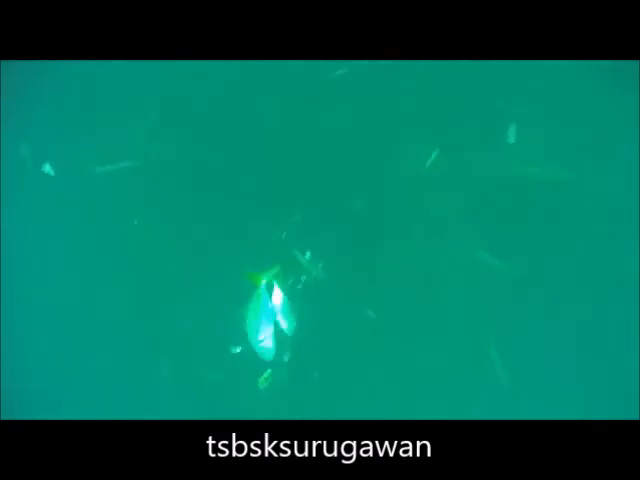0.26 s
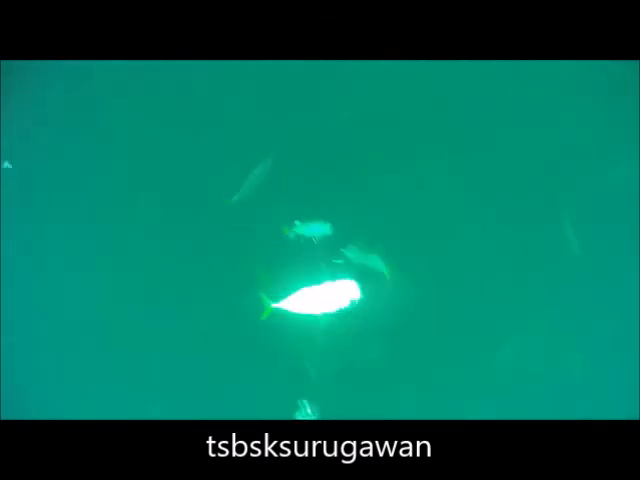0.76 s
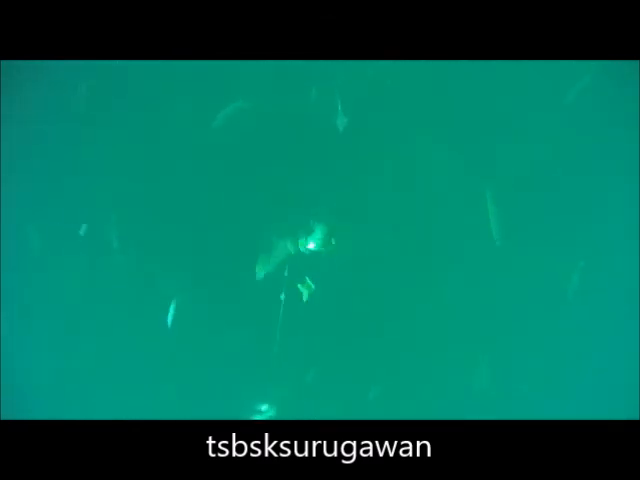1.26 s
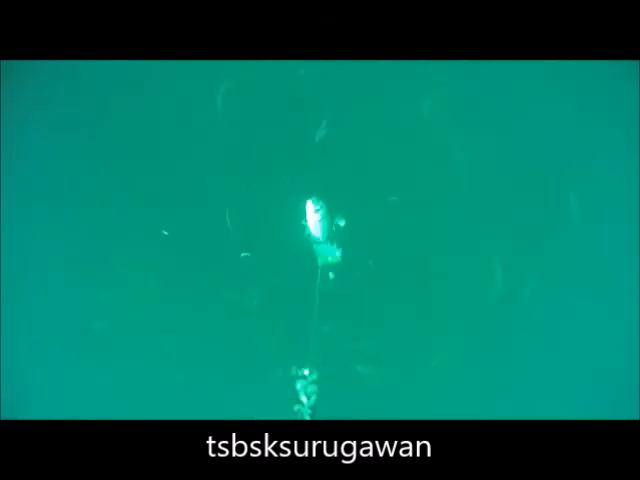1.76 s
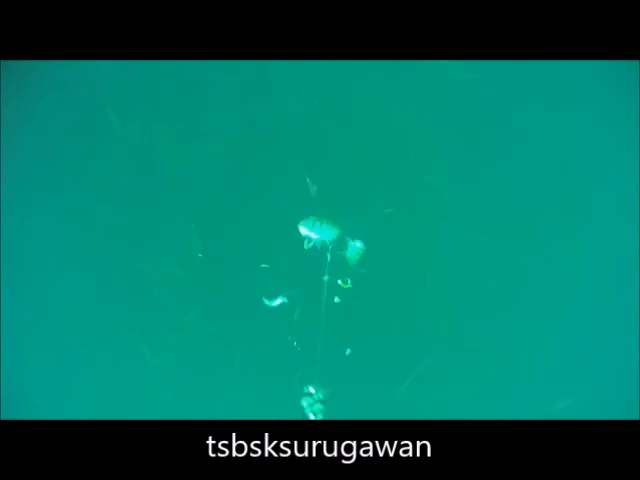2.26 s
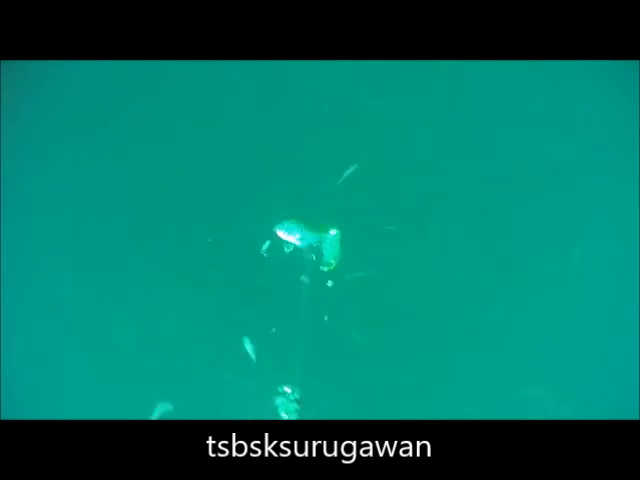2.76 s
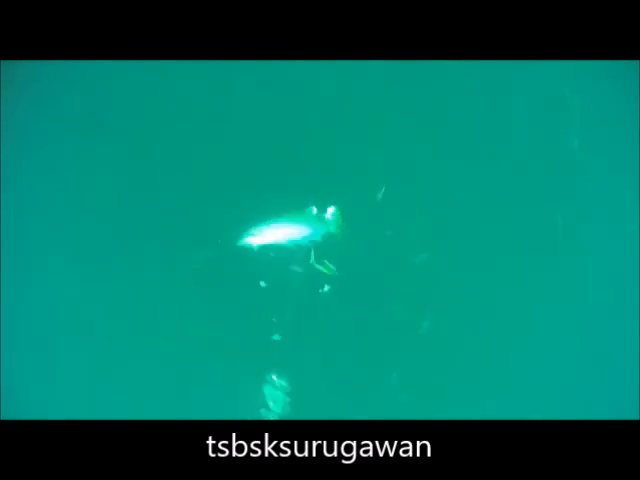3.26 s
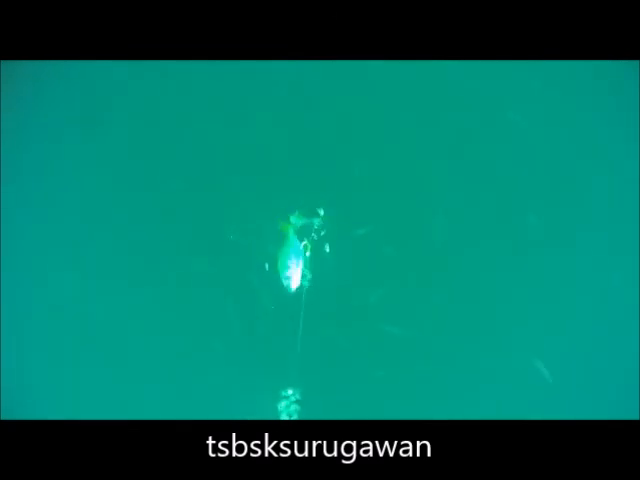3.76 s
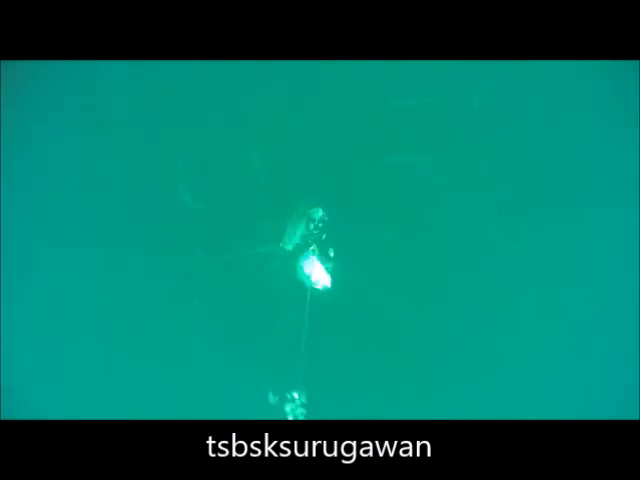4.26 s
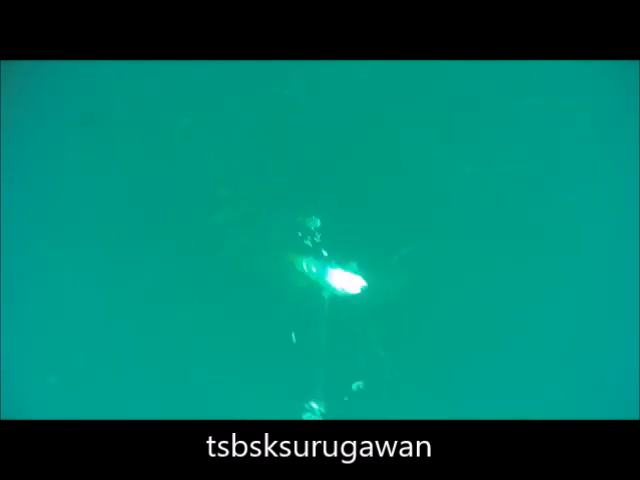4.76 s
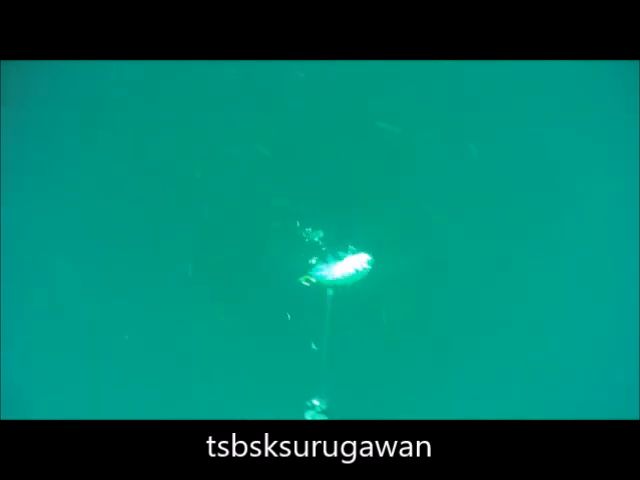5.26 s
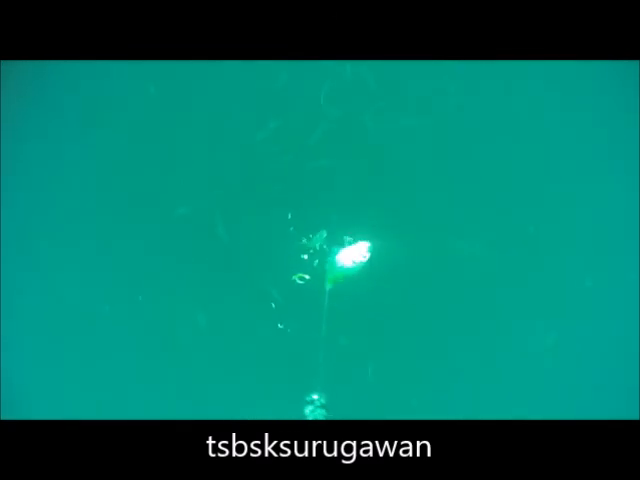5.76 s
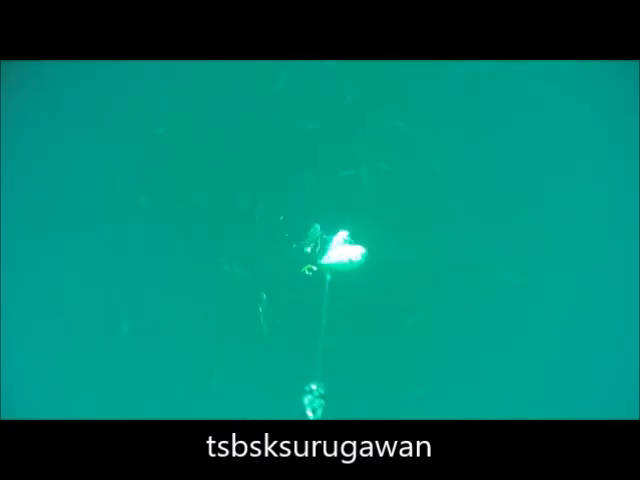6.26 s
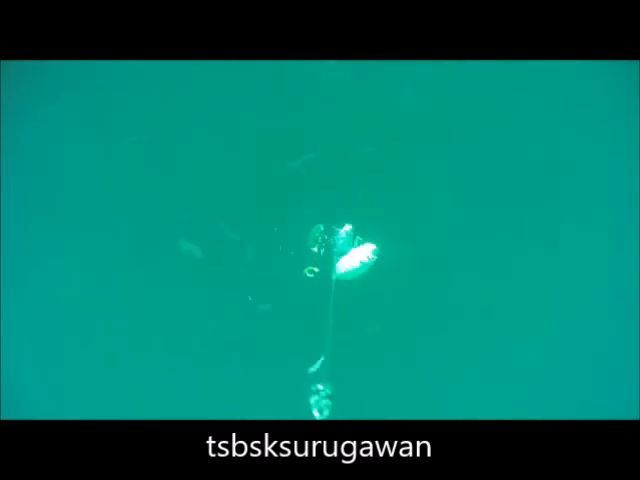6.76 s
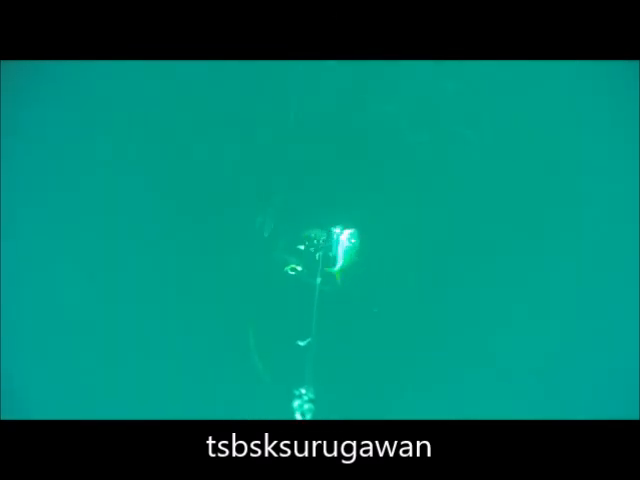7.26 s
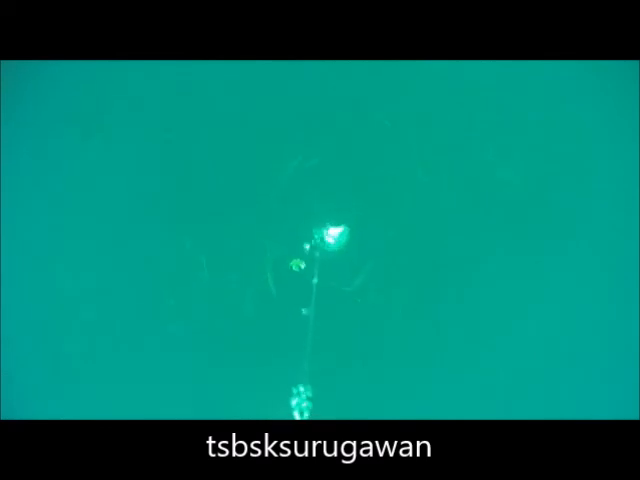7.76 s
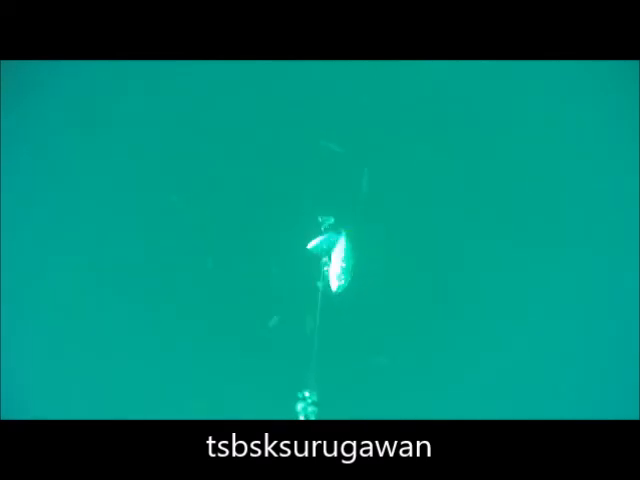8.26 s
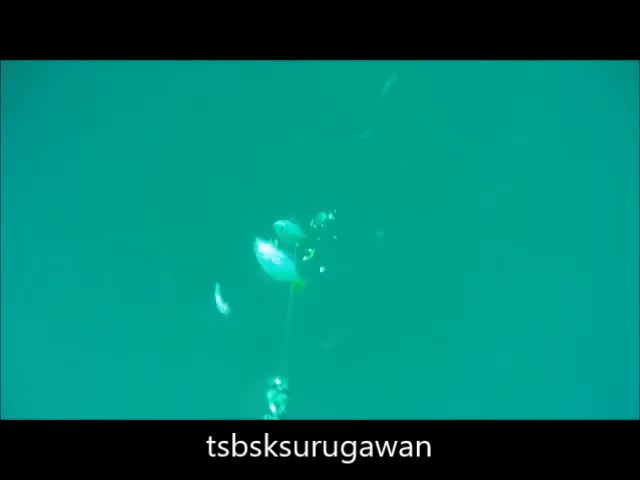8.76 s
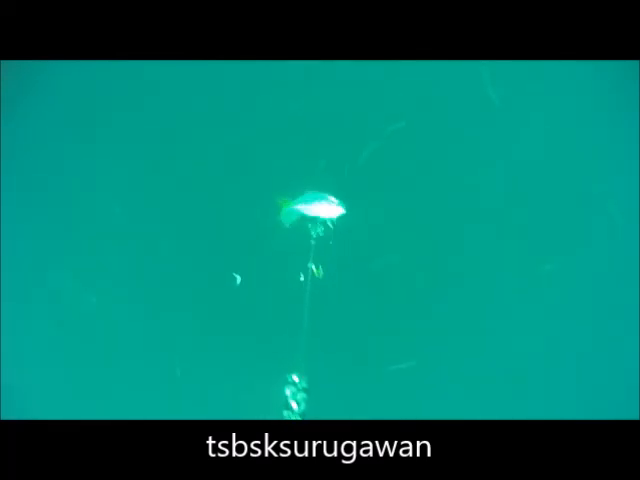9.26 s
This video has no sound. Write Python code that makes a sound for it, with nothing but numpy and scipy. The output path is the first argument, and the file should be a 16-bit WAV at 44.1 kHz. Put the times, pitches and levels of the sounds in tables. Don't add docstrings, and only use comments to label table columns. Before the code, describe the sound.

A microphone sealed in a small plastic housing under water hears a continuous hollow rush, boxy and mid-pitched, with low wash and fine fizzing. From about 0.2 to 0.9 seconds a thrashing fish makes the rigging hammer the shell: a tight cluster of hard knocks and bright clicks, sharpest near 0.7 and 0.85. Afterwards only soft, rounded tug thumps, light raps and tiny ticks come irregularly. The taut line strums with a fluttering hum briefly around 2.1 and 3.5, more strongly from 5.2 to 5.9 and 6.8 to 7.7. Near 7.9 it slackens to a lower hum, then tightens around 9 as hauling makes the water rush and roar louder, with a firm thump near 9.3, until the end at 9.5. A faint distant gear whine, slightly stronger around 6 to 7, and thin electronic hiss and whistles remain behind.

```python
import sys
import numpy as np
from scipy import signal
from scipy.fft import rfft, irfft
from scipy.io import wavfile
from scipy.ndimage import uniform_filter1d

SR = 44100
rng = np.random.default_rng(int(sys.argv[2]) if len(sys.argv) > 2 else 0)


def bounce(signal):
    frames = np.transpose(np.atleast_2d(signal))
    limited = np.clip(frames, -1, 1)
    pcm = np.round(limited * 32767).astype(np.int16)
    wavfile.write(sys.argv[1], SR, pcm)


def gain_from_db(level_db):
    decades = np.asarray(level_db, float) / 20
    return 10 ** decades


N = 419391
SECONDS = np.arange(N) / SR


def rms_one(x):
    return x / np.sqrt(np.mean(x ** 2) + 1e-20)


def in_time(rows):
    s, *columns = np.transpose(rows)
    return [np.interp(SECONDS, s, column) for column in columns]


def drift(rate_hz):
    every = 40
    r = np.exp(-2 * np.pi * rate_hz * every / SR)
    noise = rng.standard_normal(N // every + 2002)
    slow = signal.lfilter([1], [1, -2 * r, r * r], noise)[2000:]
    return np.interp(np.arange(N) / every, np.arange(len(slow)), rms_one(slow))


def colour(x, points):
    hz, db = np.transpose(points)
    grid = np.maximum(np.fft.rfftfreq(N, 1 / SR), 1)
    octaves_below = np.maximum(np.log2(hz[0] / grid), 0)
    octaves_above = np.maximum(np.log2(grid / hz[-1]), 0)
    gain_db = np.interp(np.log(grid), np.log(hz), db) - 36 * (octaves_below + octaves_above)
    return rms_one(irfft(rfft(x) * gain_from_db(gain_db), N))


def resonance(x, hz, width_hz):
    r = np.exp(-np.pi * width_hz / SR)
    poles = [1, -2 * r * np.cos(2 * np.pi * hz / SR), r * r]
    return signal.lfilter((1 - r * r) / 2 * np.array([1, 0, -1]), poles, x)


def grains(per_s, spread_db):
    sizes = gain_from_db(spread_db * np.minimum(rng.exponential(1, N), 5)) * rng.choice([-1, 1], N)
    return rms_one(sizes * (rng.random(N) < per_s / SR))


def tone(hz, level_db):
    cycles = np.cumsum(hz * np.ones(N)) / SR + rng.random()
    return np.sqrt(2) * gain_from_db(level_db) * np.sin(2 * np.pi * cycles)


def bump(at_s, width_s):
    return np.exp(-((SECONDS - at_s) / width_s) ** 2)


def haul(lag_s):
    haul_s, rise_s = 7.92, 0.35
    return 1 / (1 + np.exp((haul_s + lag_s - SECONDS) / rise_s))


# pitch_hz, width_hz, level_db
CAVITY_MODES = [(650, 990, -9), (716.5, 163, 15)]
PLATE_MODES = [(1200, 200, -27), (1560, 260, -19), (1810, 195, 0), (2050, 350, -26)]
SHELL_MODES = [(2440, 290, -4), (2990, 500, 0.5), (3650, 420, -1)]
LENS_MODES = [(4400, 240, -19), (4960, 500, 3), (5500, 400, -15), (6250, 600, -9), (7500, 600, -16)]
PORT_MODES = [(7950, 590, -4.5), (9110, 480, -0.5), (11200, 790, -8), (12860, 760, -23), (13800, 1600, -21)]
MOUNT_MODES = [(130, 67, 2), (553, 140, -19)]
FRAME_MODES = [(273, 120, -16), (600, 126, -2), (1190, 106, -5)]
CONTACT_MS = [0.77, 2.2, 1.5, 1.47, 2, 4.2, 3.9]
SNAP = [10.4, 84, 0.67, 4.4, 7, 7.9, 21]
LOADING = [0.63, 2.1, 0.69, 20, 7.2, 0.98, 11]
CAVITY, PLATE, SHELL, LENS, PORT, MOUNT, FRAME = range(7)
RING_SIZE = 2048


def strike(part, peak_db, chance, stretch=1, colour_db=(0,) * 5, widen=1):
    modes = [CAVITY_MODES, PLATE_MODES, SHELL_MODES, LENS_MODES, PORT_MODES, MOUNT_MODES, FRAME_MODES][part]
    ms = np.arange(len(chance)) / SR * 1000
    push = chance * np.exp(-(ms / CONTACT_MS[part]) ** 2)
    push[0] = SNAP[part] * np.sign(chance[0])
    ring = 0
    for j, (hz, width, db) in enumerate(modes):
        hz, width = hz * stretch, width * widen
        swell = resonance(resonance(push, hz, width), hz, 1.53 * width)
        uneven_db = db + colour_db[j] + 2.0 * chance[-1 - j]
        ring = ring + gain_from_db(uneven_db) * resonance(swell, hz, LOADING[part] * width)
    return gain_from_db(peak_db) * ring / np.max(np.abs(ring))


# start_s, level_db
FLOW = [(0.0, -29.5), (0.72, -37), (1.43, -31.5), (1.75, -34.5), (2.41, -32.5), (5.64, -31), (6.04, -35.5),
        (6.25, -30.5), (7.23, -33.5), (7.55, -31), (7.92, -32), (8.87, -28.5), (9.51, -26)]
# start_s, level_db
SWAYS = [(0.3, 7), (0.95, 4), (1.6, 10), (3.2, 6), (4.2, 4.5), (4.9, 3.5), (5.951, 3.5), (6.7, 3.5),
         (7.6, 2), (8.3, 7), (8.9, 7.5)]
# pitch_hz, level_db
RUSH = [(380, -30), (500, -31), (590, -5.5), (680, 2), (790, 6), (880, -6.5), (980, -19), (1180, -18.5),
        (1330, -39)]
PLATE_RUSH = [(1250, -39), (1500, -1), (1750, 5.5), (1900, 0.5), (2020, 2.5), (2150, -8), (2400, -11)]
WASH = [(22, -21), (60, -19), (85, -18.5), (110, -2.5), (150, 4.5), (190, -8)]
FIZZ = [(2100, -23), (2600, -5), (3200, -3), (3650, 4), (3850, -8.5), (4050, -32), (5000, -17.5),
        (6500, -34)]


def water(ease):
    cavity_db = in_time(FLOW)[0] - 2.0
    wash_db = -62.5 + sum(db * bump(s, 0.43) for s, db in SWAYS)
    plate_db = -52 + 7.5 * bump(0.55, 0.39)
    crackle_db = -56.5 + 2.5 * haul(0)
    white = rng.standard_normal((4, N))
    specks = grains(per_s=540, spread_db=-0.5)

    cavity_push = white[0] + 0.39 * grains(per_s=120, spread_db=-1.5)
    cavity = colour(cavity_push, RUSH) * gain_from_db(cavity_db + 0.84 * drift(3.4))
    plate_push = white[1] + 0.3 * specks + 0.49 * grains(per_s=40, spread_db=0.5)
    plate = colour(plate_push, PLATE_RUSH) * gain_from_db(plate_db + 1.8 * drift(5.5))
    wash = colour(white[2], WASH) * gain_from_db(wash_db + 1.3 * drift(6.6))
    crackle = colour(white[3] + 0.56 * specks, FIZZ) * gain_from_db(crackle_db + 2.0 * drift(25.0))
    port = sum(gain_from_db(db) * resonance(specks, hz, width) for hz, width, db in PORT_MODES + LENS_MODES)
    return ease * cavity + plate + wash + crackle + gain_from_db(crackle_db - 12.0) * rms_one(port)


# start_s, pitch_hz, level_db
STRUM = [(1.9, 667, -84), (2.1, 719.6, -30.5), (2.3, 794.5, -35), (2.4, 620, -41), (3.3, 627.8, -46.5),
         (3.43, 645, -33), (3.58, 640, -31), (3.66, 607, -36), (3.8, 600, -40.5), (3.95, 600, -48.5),
         (5.1, 646.7, -41), (5.17, 652, -31), (5.27, 660, -33), (5.33, 680, -51), (5.37, 735, -26.5),
         (5.42, 700, -25), (5.47, 725, -28), (5.53, 725, -35), (5.63, 765, -26), (5.67, 740, -30),
         (5.7, 695, -28), (5.75, 735, -26), (5.8, 745, -29.5), (5.86, 705, -27.5), (5.9, 655, -37),
         (5.95, 691, -54), (6.12, 650, -38), (6.3, 591, -37), (6.45, 600, -47), (6.65, 641.2, -50),
         (6.82, 645, -33.5), (6.9, 710, -33.5), (6.99, 692, -30), (7.04, 705, -32.5), (7.09, 745, -22),
         (7.13, 700, -29), (7.2, 690, -26), (7.27, 715, -27), (7.32, 685, -28), (7.42, 685, -30.5),
         (7.5, 660, -32.5), (7.56, 700, -26), (7.63, 650, -32), (7.7, 640, -36.5), (9.21, 670, -33.5),
         (9.27, 640, -38.5), (9.4, 645, -33.5), (9.51, 700, -22)]
# start_s, pitch_hz, level_db
SLACK = [
    (7.78, 585, -43),
    (7.869, 495, -46.5),
    (8.15, 506, -34.5),
    (8.45, 522, -39.5),
    (8.649, 580.4, -44.5),
    (8.901, 600, -31),
    (8.999, 640, -26),
    (9.101, 620, -29.5),
]


def line_strum():
    hz, level_db = in_time(sorted(STRUM + SLACK))
    phase = 2 * np.pi * np.cumsum(hz + 8.0 * drift(14)) / SR
    fray = 0.3 + 0.007 * np.maximum(662 - hz, 0)
    steady = 2.5 + drift(35.0) + fray * drift(54.0)
    slipping = drift(25.0) + fray * drift(47.0)
    wave = steady * np.cos(phase) + slipping * np.sin(phase)
    return gain_from_db(level_db) * rms_one(wave / np.sqrt(1 + fray ** 2))


# start_s, thump_db, click_db, place
KNOCKS = [(0.213, -14.5, -25, 1.1), (0.3527, -14.5, -20.5, -0.33), (0.3566, -21, -25, 0.7),
          (0.368, -27, -34, 0.16), (0.363, -22, -29, -0.35), (0.3728, -28, -28, 0.25),
          (0.3905, -29, -30, 1.1), (0.4096, -15.5, -30, -0.36), (0.427, -10.5, -30, 0.087),
          (0.475, -21, -33, -0.14), (0.5215, -25, -19, 0.41), (0.5384, -23.5, -35, 0.4),
          (0.5684, -2.5, -19, -0.13), (0.5962, -22, -22, 1.36), (0.6, -17.5, -33, 0.1),
          (0.7018, -10.5, -3.5, 1.15), (0.716, -23, -32, 0.12), (0.736, -23, -29, -0.22),
          (0.8213, -26, -29, -0.71), (0.8473, -9.5, -7.5, 1.23), (0.8502, -19, -16, 1.6),
          (0.8535, -12, -21, 0.74), (0.8556, -11.5, -16, 0.79)]
# start_s, thump_db, click_db, place
RAPS = [(1.386, -28, -34, 0.15), (1.401, -26.5, -31, 0.52), (1.7902, -41, -35.5, 0.27),
        (1.869, -32, -24, -0.57), (1.885, -45, -33.5, 0.11), (3.3589, -28, -31, 0.29),
        (3.362, -19.5, -27, 0.48), (3.4732, -34, -33, -0.0008), (3.7066, -36, -26, 0.14),
        (3.7896, -27.5, -25, 0.9), (3.874, -32, -38, 0.15), (3.9496, -27, -29, 0.23),
        (4.1748, -26.5, -24, 0.84), (7.1419, -32, -38, -0.14), (7.6585, -34, -28, 0.69),
        (7.867, -18.5, -30, 0.28), (8.0887, -44, -26, 0.05), (8.0967, -39, -26.5, 0.6),
        (8.191, -34, -36.5, 0.067), (8.4955, -41, -27.5, 0.38), (8.5058, -42, -23, 0.93),
        (9.0574, -35, -38, 0.18), (9.357, -31.5, -37, 0.5), (9.413, -29.5, -32, -0.25)]
# start_s, click_db, place
CLICKS = [(0.014, -29.5, 2.85), (0.8363, -26, 1.76), (1.2433, -25, 3.2), (1.262, -37, 2.1),
          (2.2326, -28, 2.7), (2.2478, -31, 1.6), (3.533, -38, 1.3), (6.3465, -35, 2.4), (6.4622, -37, 2.7),
          (7.4437, -31, 0.79), (7.6519, -24, 1.5), (8.0637, -33, 0.89), (8.598, -35, 0.83),
          (8.7289, -34, 2.8), (8.7904, -32, 1.8)]


def knocks():
    out = np.zeros(N + RING_SIZE)
    thrash_end_s = KNOCKS[-1][0]
    clicks = [(s, db, place, 7.5) for s, _, db, place in KNOCKS + RAPS]
    clicks += [(s, db, place, 3.5) for s, db, place in CLICKS]
    for s, click_db, place, loss_db in clicks:
        chance = rng.standard_normal((3, RING_SIZE))
        light = s > thrash_end_s
        for k, part in enumerate([SHELL, LENS, PORT]):
            tilt_db = 3.5 * np.arange(5) * (light and part == SHELL)
            peak_db = click_db - loss_db * (k - place) ** 2
            out[round(s * SR):][:RING_SIZE] += strike(part, peak_db, chance[k], 0.98, tilt_db, 1.4 ** light)
    for s, thump_db, _, place in KNOCKS + RAPS:
        stretch = 1 + 0.055 * place - 0.044 * (s > thrash_end_s)
        side_modes_db = 9.5 * abs(place) * np.array([1, 1, 0, 1])
        chance = rng.standard_normal(RING_SIZE)
        out[round(s * SR):][:RING_SIZE] += strike(PLATE, thump_db, chance, stretch, side_modes_db)
    return out[:N]


COUPLING_DB = [-4, 0, -15.5, -19.5, -4.5, -7.5, 0.5]
# start_s, peak_db, pitch_hz
TUGS = [(0.288, -14.5, 730), (0.4092, -7, 790), (0.568, -8.5, 790), (0.701, -13, 650), (0.791, -19, 740),
        (0.801, -17, 770), (0.823, -20, 776), (0.855, -20, 795), (0.92, -17.5, 773), (1.304, -18, 785),
        (1.414, -16, 772), (1.496, -20, 775), (1.566, -21, 745), (1.611, -20, 783), (2.33, -16.5, 775),
        (2.917, -13, 752), (3.215, -17, 674), (3.251, -22, 717), (3.274, -16.5, 737), (3.529, -14.5, 767),
        (3.872, -19.5, 710), (4.213, -13, 723), (4.53, -14.5, 770), (4.596, -22, 772), (4.644, -13, 778),
        (4.708, -22, 668), (5.027, -26, 665), (5.157, -19, 687), (5.215, -28, 696), (5.324, -34, 780),
        (5.376, -19, 765), (5.527, -15.5, 724), (5.612, -37, 740), (5.69, -31, 720), (5.811, -18, 740),
        (5.829, -19, 640), (5.977, -14.5, 707), (6.7, -17.5, 713), (6.802, -19.5, 680), (6.857, -24, 655),
        (6.899, -14, 713), (7.049, -15.5, 712), (7.186, -26, 704), (7.454, -16, 686), (7.564, -13, 704),
        (7.629, -11.5, 680), (7.697, -20.5, 645), (7.749, -21, 710), (8.006, -18.5, 706),
        (8.151, -16.5, 740), (8.388, -34, 789), (8.593, -17.5, 789), (8.767, -22, 796), (9.172, -21, 650),
        (9.262, -31, 744), (9.333, -7.5, 692), (9.443, -13, 742)]


def tugs():
    out = np.zeros(N + RING_SIZE)
    for s, peak_db, hz in TUGS:
        chance = rng.standard_normal(RING_SIZE)
        stretch = hz / 727
        out[round(s * SR):][:RING_SIZE] += strike(CAVITY, peak_db + COUPLING_DB[CAVITY], chance, stretch)
    return out[:N]


def easing():
    gain, size = np.ones(N), 1024
    lead_s, width_s = 0.0051, 0.0082
    around_s = np.arange(-size, size) / SR
    dip = 1 - 0.12 * np.exp(-((around_s + lead_s) / width_s) ** 2)
    for s, _, _ in TUGS:
        gain[round(s * SR) - size:][:2 * size] *= dip
    return gain


# start_s, peak_db
BUMPS = [(0.006, -35), (0.0235, -29.5), (0.752, -32), (0.773, -33), (0.78, -33), (0.7985, -29),
         (3.073, -37), (3.291, -32.5), (3.365, -27), (4.03, -35), (4.516, -38), (4.673, -35), (5.084, -40),
         (7.808, -32), (7.85, -30)]
# start_s, peak_db
GRIT = [(1.8692, -24.5), (2.0545, -40), (2.0682, -37), (2.1086, -47), (2.807, -48), (3.186, -36),
        (3.9584, -48), (5.2759, -52), (5.2864, -42), (5.65, -36), (6.324, -40.5), (6.3315, -35),
        (6.3634, -43), (6.6149, -42), (6.7002, -39), (6.7403, -42), (6.8018, -39), (6.8638, -46),
        (6.8799, -33.5), (8.708, -55), (8.8854, -37)]
# start_s, peak_db
THUDS = [(0.7, -37), (0.851, -56), (0.928, -31), (3.201, -32), (5.829, -32), (7.566, -34), (7.628, -32),
         (9.12, -35)]
# start_s, peak_db
TICKS = [(1.021, -26), (1.22, -27), (1.23, -20.5), (1.566, -33), (1.986, -27), (0.59, -22), (6.257, -27),
         (1.551, -24), (2.86, -41), (3.7, -20), (3.719, -21), (4.475, -20), (5.466, -25), (5.5, -25),
         (5.601, -24), (6.214, -24), (6.325, -23), (6.832, -24), (7.364, -23.5), (7.433, -20), (8.054, -23),
         (8.586, -26), (8.754, -20)]
# start_s, peak_db
JOLTS = [(0.213, -29.5), (7.52, -42), (7.564, -38), (8.109, -31), (0.569, -27), (0.7014, -15.5),
         (0.846, -21.5), (7.868, -30)]


def light_contacts():
    out = np.zeros(N + RING_SIZE)
    contacts = [(PLATE, BUMPS), (PORT, GRIT), (MOUNT, THUDS), (SHELL, TICKS), (LENS, TICKS), (FRAME, JOLTS)]
    for part, table in contacts:
        for s, peak_db in table:
            chance = rng.standard_normal(RING_SIZE)
            out[round(s * SR):][:RING_SIZE] += strike(part, peak_db + COUPLING_DB[part], chance)
    return out[:N]


# pitch_hz, level_db
MURMUR = [(190, -0.3), (260, -0.99), (330, -0.64)]
ROAR = [(330, -3), (420, 2), (520, 3.5), (900, 8), (1150, -5), (1400, -4), (1650, -4.5)]


def wake():
    white = rng.standard_normal((2, N))
    murmur_db = -57 - 0.5 * (SECONDS - 4) + 4.5 * haul(0.84)
    roar_db = -51 + 12 * haul(0)
    murmur = colour(white[0], MURMUR) * gain_from_db(murmur_db + 1.7 * drift(1.6))
    return murmur + colour(white[1], ROAR) * gain_from_db(roar_db + 2.74 * drift(19.0))


# start_s, pitch_hz, depth_db
CANCEL = [
    (7.75, 320, 2),
    (8.1, 308, -6),
    (8.6, 264, -14),
    (8.9, 235, -19),
    (9.51, 235.5, -6),
]


def surface_echo(x):
    at, centre_hz, depth_db = np.transpose(CANCEL)
    start = round(at[0] * SR)
    hz, s, lines = signal.stft(x[start:], SR, nperseg=4096)
    octaves = np.log2((hz[:, None] + 1) / np.interp(s + at[0], at, centre_hz))
    gain_db = np.interp(s + at[0], at, depth_db) * np.exp(-(octaves / 0.21) ** 2)
    cut = signal.istft(lines * gain_from_db(gain_db), SR, nperseg=4096)[1]
    return np.concatenate([x[:start], cut])[:N]


# start_s, pitch_hz, level_db
EDDY = [(1.3, 248.5, -75), (1.55, 236, -60), (2.05, 228, -56), (2.3, 270, -84), (2.65, 305, -63),
        (3.1, 289, -62), (3.45, 325, -59.5), (3.8, 322, -66), (7.7, 222.6, -76), (7.95, 226.4, -59),
        (8.15, 240.6, -60.5), (8.3, 302.2, -73), (8.45, 455, -46), (8.8, 453, -54), (9.0, 384, -59),
        (9.3, 342, -61), (9.51, 346, -47.5)]


def eddy():
    hz, level_db = in_time(EDDY)
    return tone(hz + 4.0 * drift(4.0), level_db + 4.0 * drift(9.0))


def port_song():
    hz, width_hz = 9450, 510
    gusts = rng.standard_normal(N) * gain_from_db(7.4 * drift(5.5))
    push = gusts + 1.3 * grains(per_s=21, spread_db=2.5)
    return gain_from_db(-72.5) * rms_one(resonance(resonance(push, hz, width_hz), hz, width_hz))


# start_s, pitch_hz, level_db
GEARS = [(0, 1855, -58), (1, 1858, -55), (3.5, 1866, -53), (4.6, 1868, -58), (5.3, 1872, -54),
         (6.2, 1868, -45.5), (6.95, 1864, -45.5), (7.2, 1862, -53), (7.5, 1858, -56), (7.85, 1842, -57),
         (9.51, 1838, -61)]
# above_mesh_hz, level_db
SIDE_LINES = [(70, 0), (141, -3), (182, -8)]
# start_s, pitch_hz, level_db
HUM = [(0, 197, -51.5), (1.6, 197, -60), (1.9, 197, -50), (2.45, 200, -48), (2.6, 201, -60.5),
       (4.7, 199, -58.5), (5, 200, -83), (9.51, 200, -105)]
# multiple_of_hum, level_db
HUM_ORDERS = [(0.251, -79.5), (0.75, -66.5)]


def boat():
    mesh_hz, mesh_db = in_time(GEARS)
    side_db = -56.5 + 0.18 * (mesh_db + 47)
    out = tone(mesh_hz + 0.77 * drift(2.1), mesh_db + 1.2 * drift(2.1))
    for above_hz, db in SIDE_LINES:
        out += tone(mesh_hz + above_hz + 1.424 * drift(1.284), side_db + db + 2.5 * drift(3.0))
    out += tone(2 * mesh_hz + 1.5 * drift(2.1), mesh_db - 18 + 2.5 * drift(2.0))
    hum_hz, hum_db = in_time(HUM)
    for multiple, db in HUM_ORDERS:
        out += tone(multiple * hum_hz, db + 0.59 * drift(0.62))
    return out + tone(hum_hz + 1.5 * drift(4.0), hum_db - 3 + 3.5 * drift(6.0))


# pitch_hz, level_db
HISS = [(3500, 7), (5000, 4), (7000, 1.5), (7550, -0.5), (8400, 0.5), (9200, 5), (9900, 1), (13000, 0),
        (15300, 1)]
# pitch_hz, level_db
WHISTLES = [(6575, -73.5), (9299, -85)]
# ripple_order, level_db
CLOCK_SIDES = [(-4, -16), (-3, -15), (-2, -10), (-1, -5), (0, 0), (1, -6), (2, -14)]


def circuits():
    clock_hz, ripple_hz = 13150, 50
    clock = sum(gain_from_db(db) * np.sin(2 * np.pi * (clock_hz + k * ripple_hz) * SECONDS) for k, db in CLOCK_SIDES)
    clock_db = -64.5 - 10 * SECONDS / SECONDS[-1]
    hiss = gain_from_db(-55.5 + 0.9 * drift(16.0)) * colour(rng.standard_normal(N), HISS)
    return hiss + sum(tone(hz, db) for hz, db in WHISTLES) + gain_from_db(clock_db) * clock


# start_s, length_s
SMEARED = [
    (3.706, .024),
    (3.942, .026),
    (7.656, .03),
]
SMEAR_KEPT_HZ = [1650, 1900, 2850, 3250, 3550, 3850, 5000, 7000]


def smear(x):
    out = x.copy()
    for s, length_s in SMEARED:
        size = round(length_s * SR)
        at = round(s * SR) - size // 2
        window = signal.windows.tukey(size, 0.4)
        hz, lines = np.fft.rfftfreq(size, 1 / SR), rfft(x[at:at + size] * window)
        treble = hz > 1400
        away_hz = np.abs(hz[:, None] - SMEAR_KEPT_HZ).min(axis=1)
        kept = np.where(away_hz < 130, 1, 0.25)
        any_phase = np.exp(2j * np.pi * rng.random(len(hz)))
        scattered = 1.1 * np.abs(lines) * treble * kept * any_phase
        out[at:at + size] += irfft(scattered, size) * window - irfft(lines * treble, size)
    return out


STARVED = [1.449, 1.704, 2.449, 2.49, 2.788, 3.003, 3.09, 5.264, 5.584, 5.858, 7.399, 7.523, 8.161, 8.697,
           8.955, 9.102, 9.19, 9.297]
# start_s, length_s, loss_db
DRAINED = [(0.79, 0.0072, 3), (2.3, 0.0116, -1), (0.71, 0.0082, 8), (0.819, 0.031, 16)]


def starve(x):
    hz = np.fft.rfftfreq(N, 1 / SR)
    treble = irfft(rfft(x) / (1 + (2300 / (hz + 1)) ** 8), N)
    out = x.copy()
    for s, length_s, loss_db in [(s, 0.016, 3) for s in STARVED] + DRAINED:
        size = round(1.5 * length_s * SR)
        at = round(s * SR) - size // 2
        window = signal.windows.tukey(size, np.clip(0.019 / (2.3 * length_s), 0, 1))
        lines = rfft(treble[at:at + size] * window)
        needed = np.interp(np.fft.rfftfreq(size, 1 / SR), [2500, 6500], [1.3, 2.1])
        weak = np.abs(lines) < needed * uniform_filter1d(np.abs(lines), size=25)
        out[at:at + size] -= (1 - gain_from_db(-12 - loss_db)) * irfft(lines * weak, size) * np.sqrt(window)
    return out


# pitch_hz, level_db
KEPT = [(4000, -16), (7000, -7), (12500, -8), (14000, -1), (14950, 3), (15100, 14), (15900, 15),
        (16300, 30)]


def ragged_top(x):
    hz, s, lines = signal.stft(x, SR, nperseg=1024)
    hiss = np.median(np.abs(lines[(hz > 13500) & (hz < 14130)]))
    strict_db = np.interp(s * SR, np.arange(N), 2.2 * drift(2.5))
    needed = hiss * gain_from_db(np.interp(hz, *np.transpose(KEPT), left=-99)[:, None] + strict_db)
    return signal.istft(lines * (np.abs(lines) > needed), SR, nperseg=1024)[1][:N]


def scene():
    ease = easing()
    flow = surface_echo(water(ease) + wake())
    contacts = knocks() + tugs() + light_contacts()
    return (flow + ease * line_strum() + contacts + eddy() + port_song() + boat())[None]


def top_cut(x):
    return signal.sosfilt(signal.butter(12, 16340, fs=SR, output="sos"), x)


def record(dry):
    x = dry[0] + circuits()
    notch_hz, width_hz = 7893, 540
    for _ in range(2):
        x = signal.lfilter(*signal.iirnotch(notch_hz, notch_hz / width_hz, SR), x)
    x = 1.4 * np.tanh(x / 1.4)
    mix = ragged_top(starve(smear(x)))[None]
    return top_cut(mix)


dry = scene()
out = record(dry)
bounce(out)
```